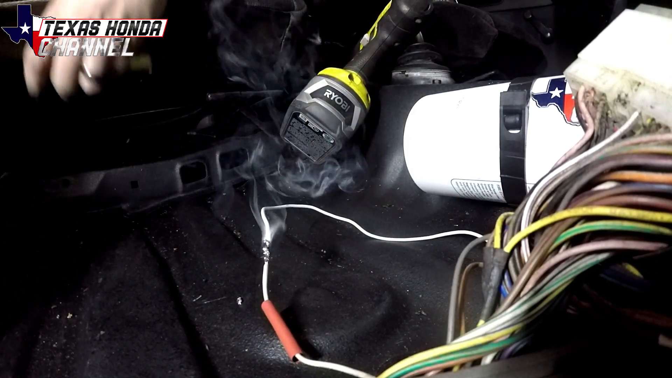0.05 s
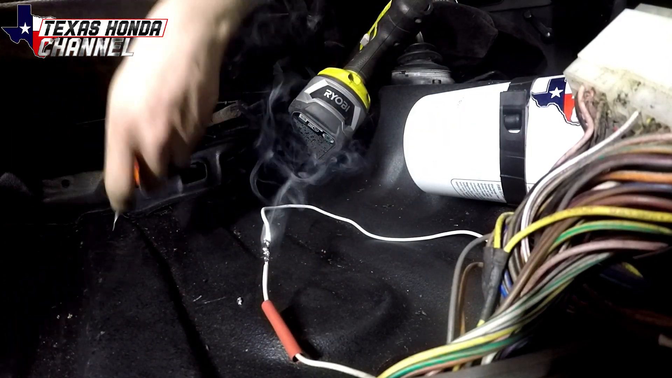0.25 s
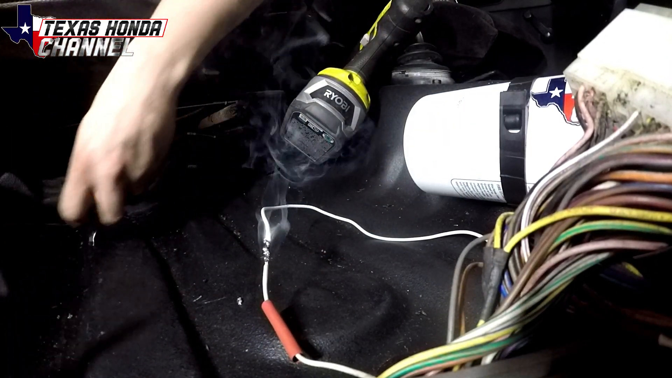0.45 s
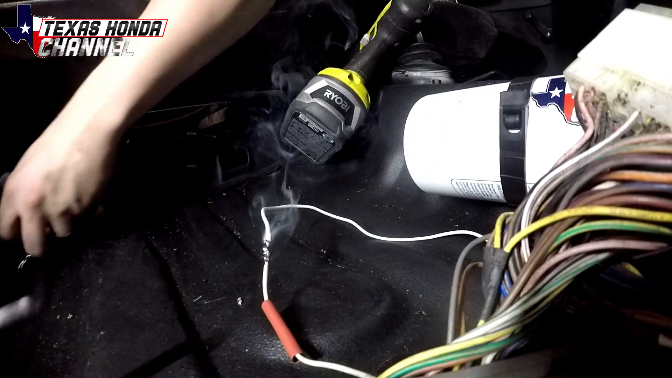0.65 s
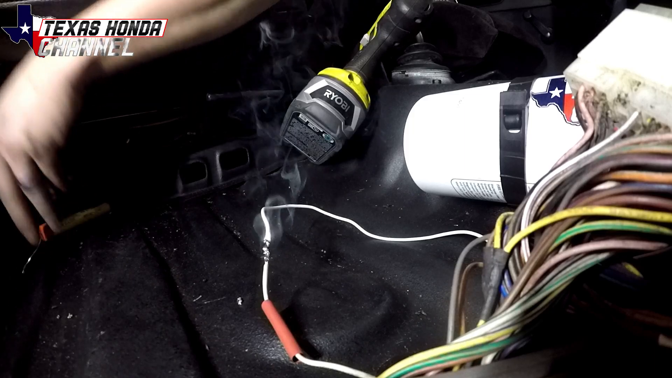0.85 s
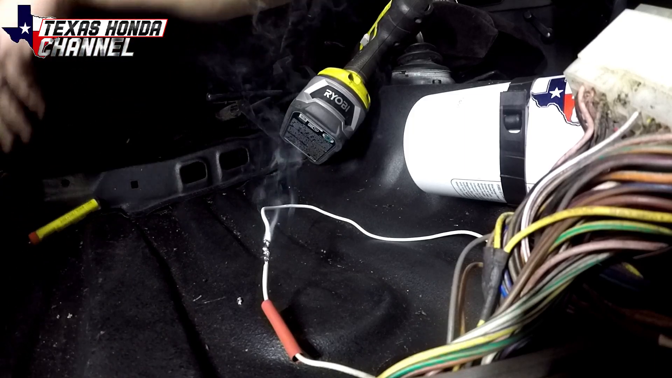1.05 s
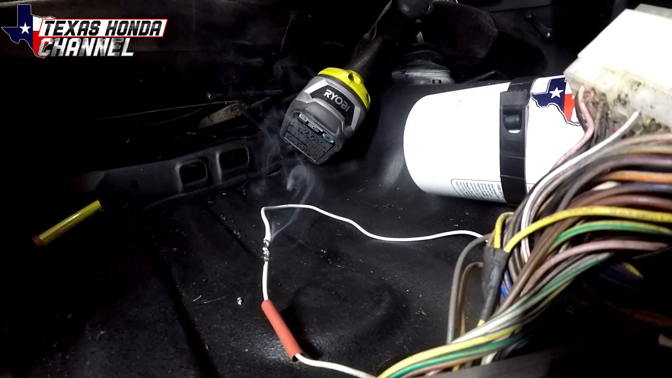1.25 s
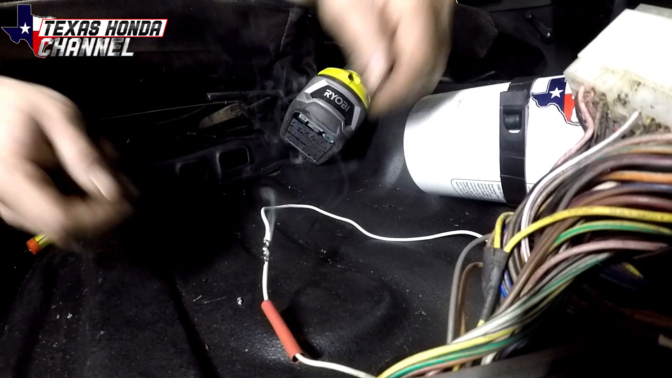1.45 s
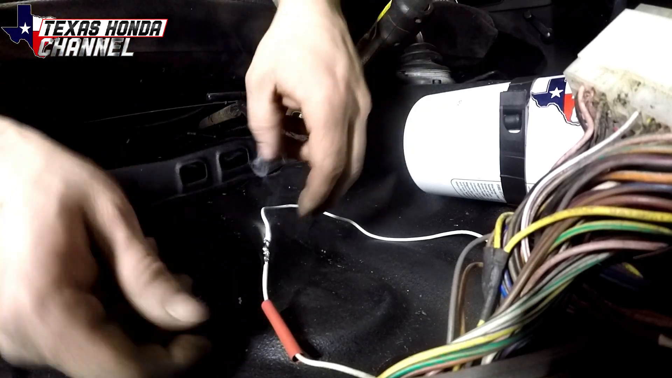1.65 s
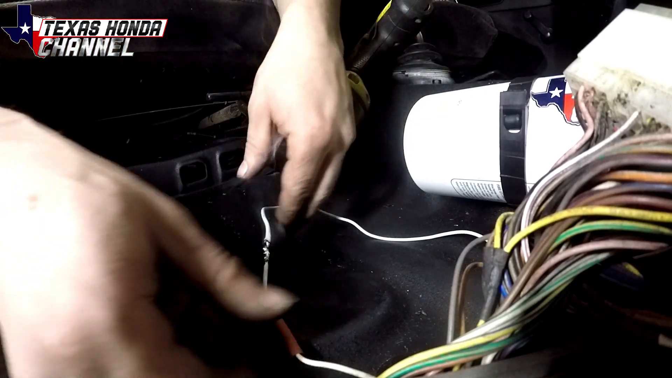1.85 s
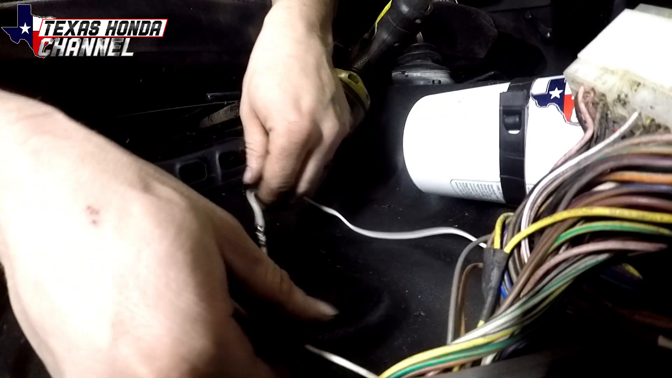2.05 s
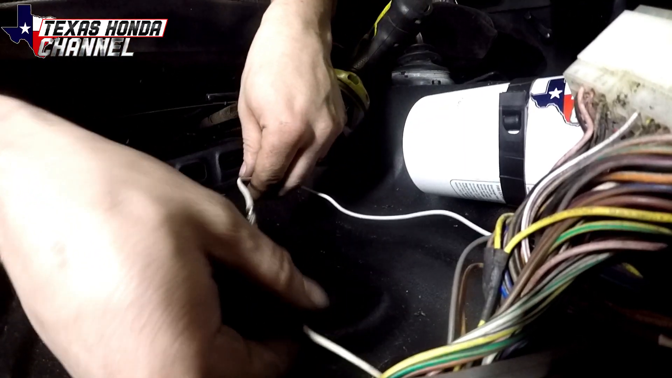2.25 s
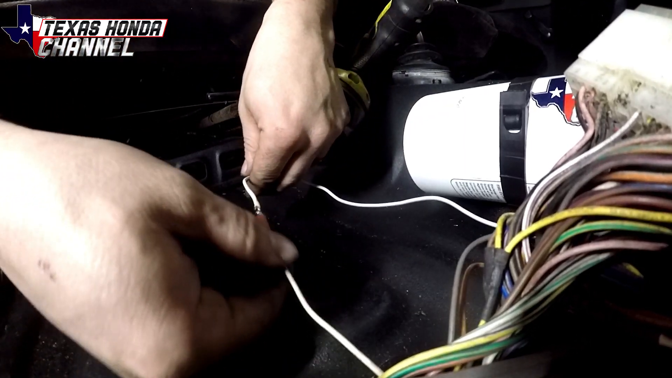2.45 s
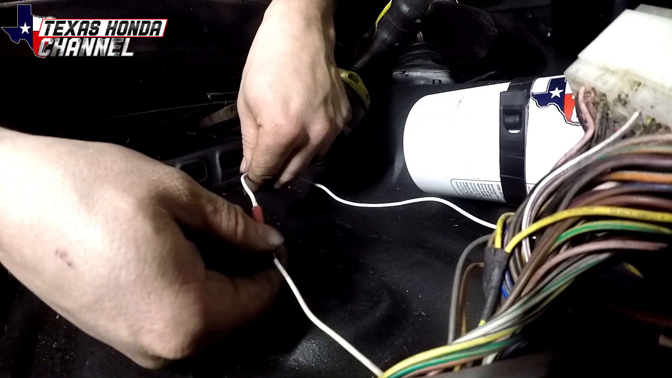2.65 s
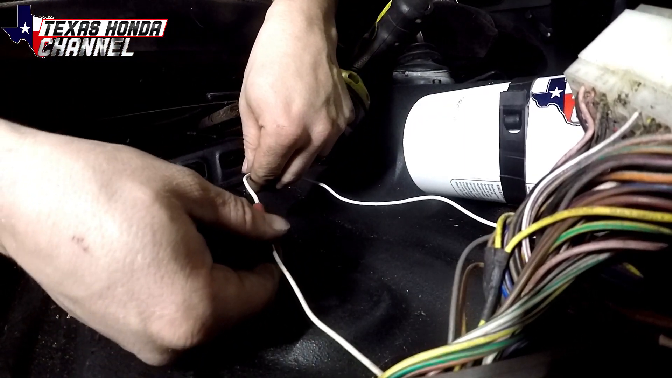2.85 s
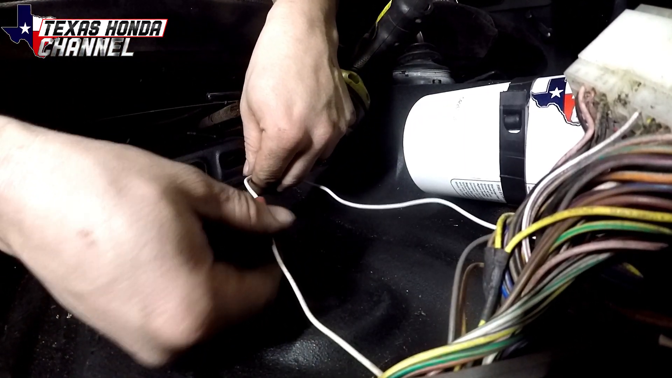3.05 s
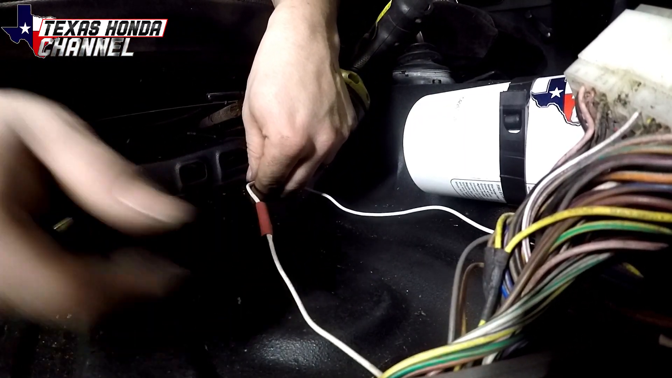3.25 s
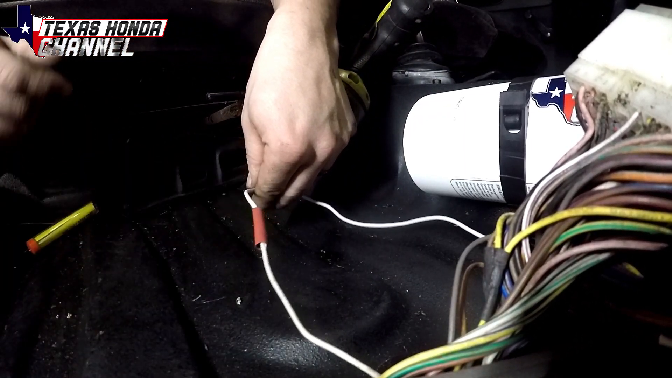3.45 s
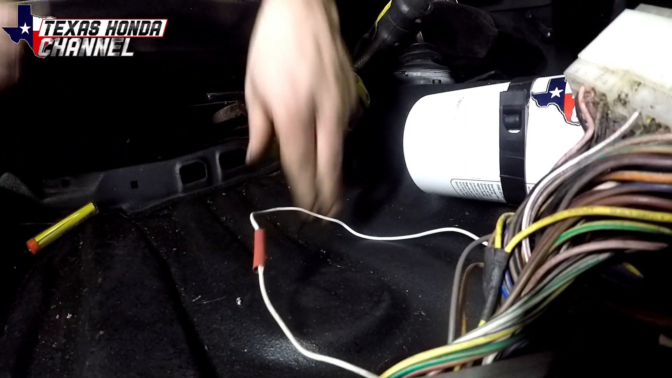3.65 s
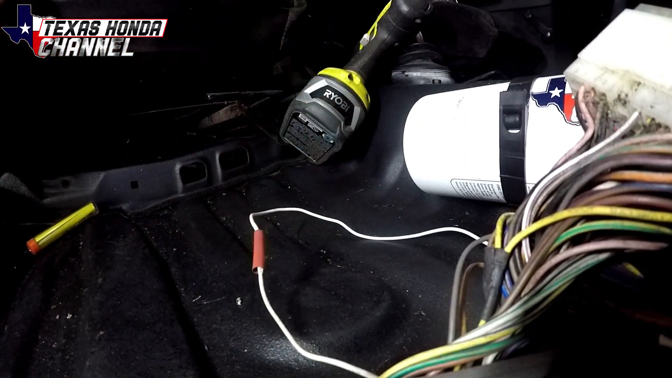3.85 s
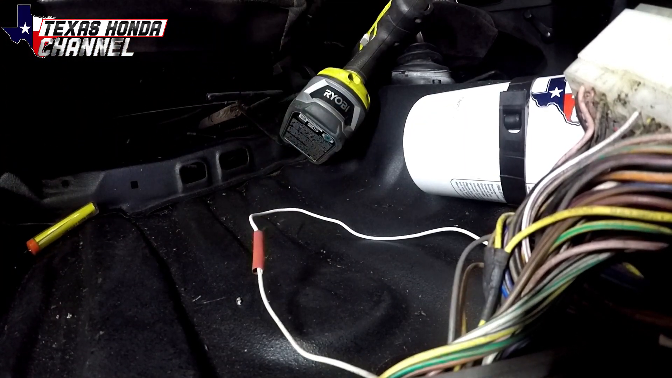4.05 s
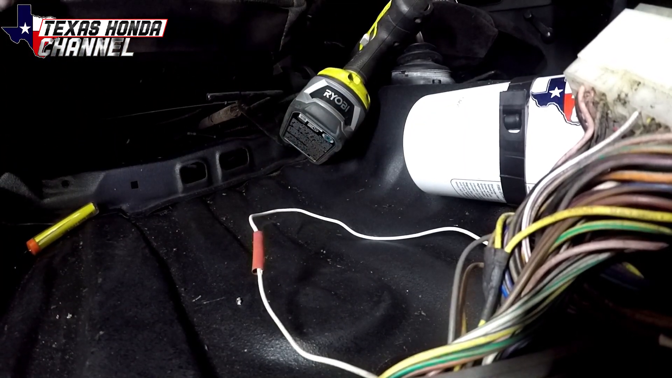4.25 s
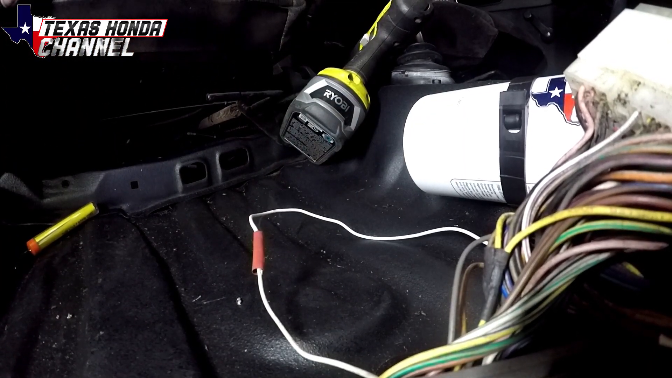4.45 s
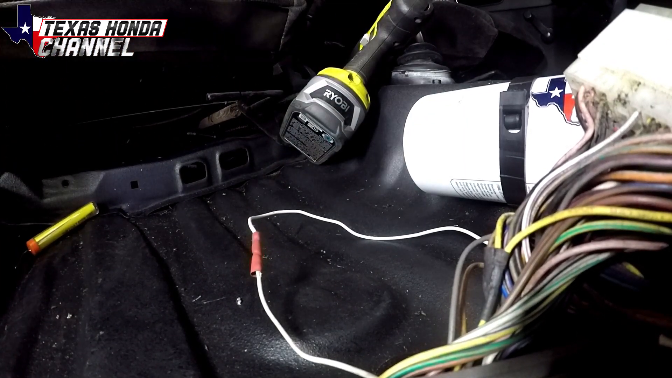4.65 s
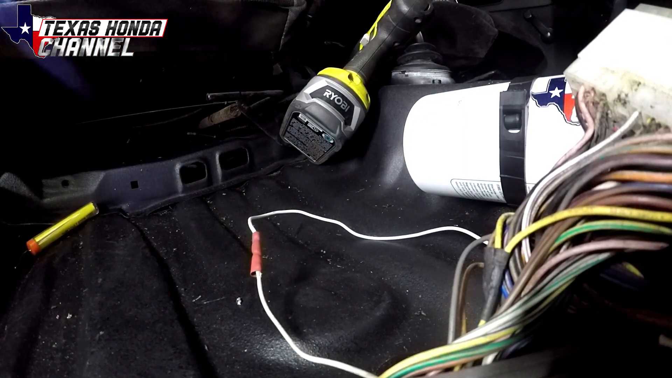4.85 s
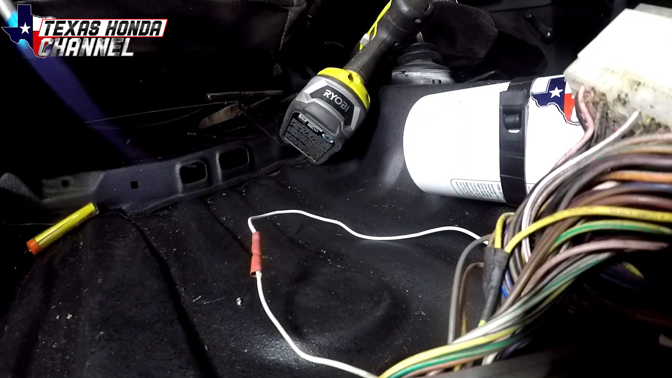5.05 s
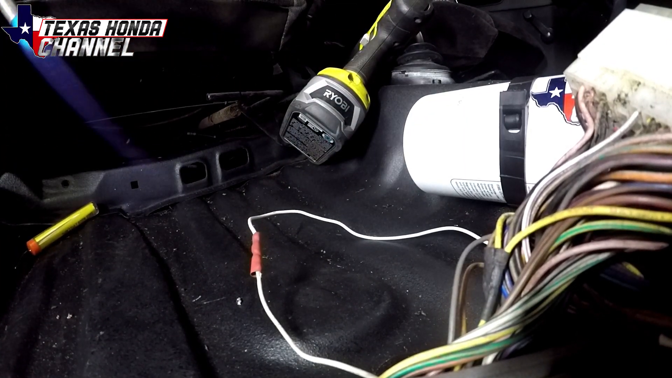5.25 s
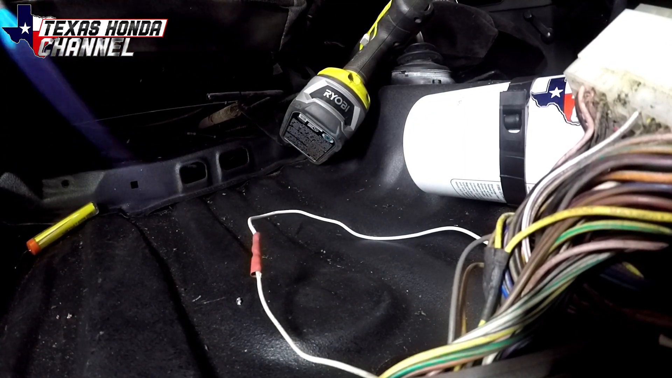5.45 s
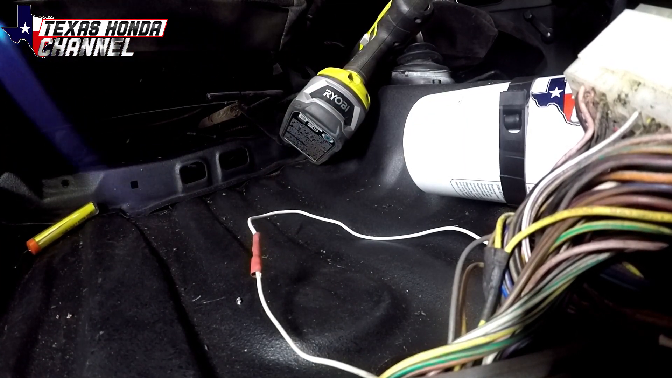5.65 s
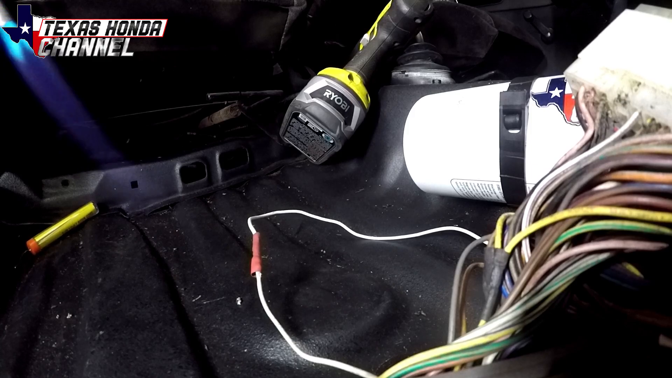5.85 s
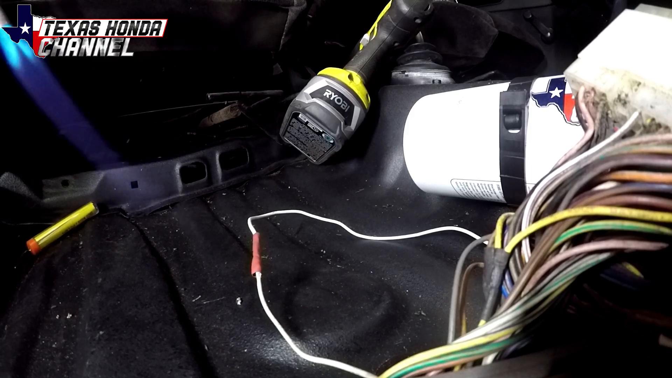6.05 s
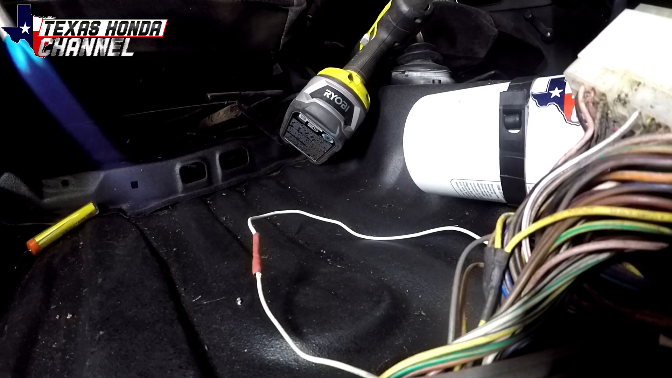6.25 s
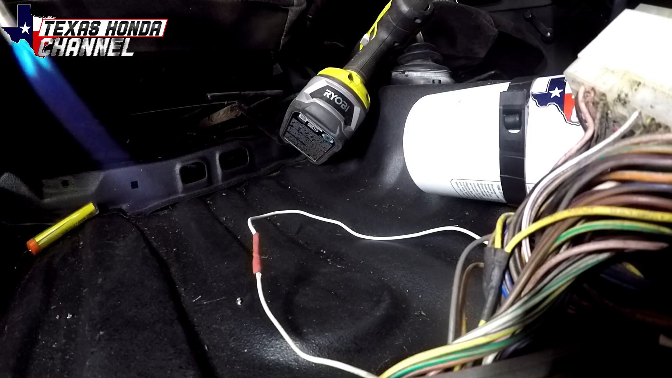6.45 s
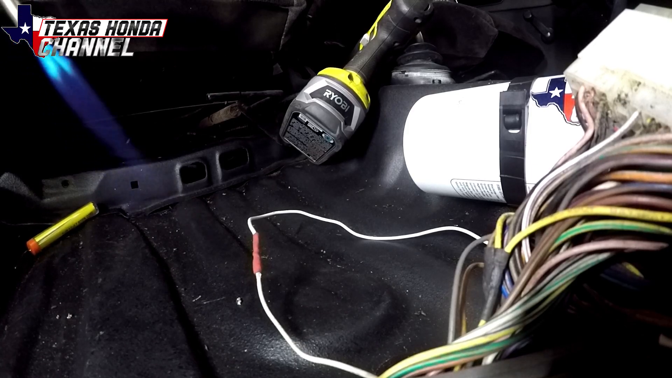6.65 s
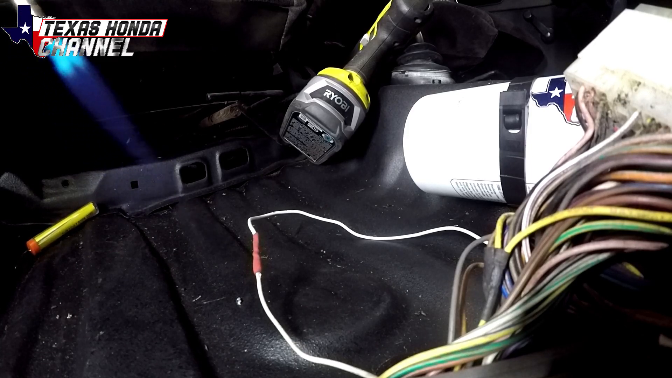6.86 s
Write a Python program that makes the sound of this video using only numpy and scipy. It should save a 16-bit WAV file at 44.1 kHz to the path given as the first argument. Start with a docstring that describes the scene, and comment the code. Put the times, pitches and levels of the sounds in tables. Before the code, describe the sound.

Hand tools clack and thud on a carpeted metal car floor, soft rustling follows, then a gas torch lights and roars with steady hiss.

```python
"""A low garage rumble with a faint motor hum and the rustle of hands come first: all shaped noise, plus hum tones.
The hands slide shrink tubing along a spliced wire on the carpeted floor of a stripped car.
Hand tools clack, the floor pan thuds (both decaying tones with bursts of noise) and leaning arms rumble.
Then a gas torch lights and burns on: noise for its roaring flame, its ringing burner tube and its hissing jet.
Echoes from the nearby panels colour the hiss as the torch is moved in."""
import sys
import numpy as np
from scipy import signal
from scipy.fft import rfft, irfft, next_fast_len
from scipy.io import wavfile
from scipy.ndimage import map_coordinates

SR = 44100
rng = np.random.default_rng(int(sys.argv[2]) if len(sys.argv) > 2 else 0)


def wav_record(signal):
    """Record a signal, one row per channel, as 16-bit PCM in the file named by sys.argv[1]."""
    frames = np.transpose(np.atleast_2d(signal))
    bounded = np.clip(frames, -1, 1)
    # unit amplitude maps onto the largest positive 16-bit level
    quanta = np.round(bounded * 32767).astype(np.int16)
    wavfile.write(sys.argv[1], SR, quanta)


N = 304731  # length of the scene (samples)


def amp(db):
    """Turn decibels into a gain."""
    return 10 ** (np.asarray(db) / 20)


def unit(x):
    """Scale x to an rms of 1."""
    return x / np.sqrt(np.mean(x ** 2) + 1e-20)


def along(points, hz):
    """Join (f/Hz, value) points with straight lines on a log frequency axis."""
    f, v = np.transpose(points)
    return np.interp(np.log(hz + 1), np.log(f + 1), v)


def wobble(rate):
    """Make a smooth random curve with this many random knots a second."""
    knots = rng.standard_normal(int(N * rate / SR) + 4)
    return map_coordinates(knots, [np.arange(N) * rate / SR])


def filtered(x, response):
    """Pass x through a filter of gain response(Hz) that reacts only after its input (minimum phase)."""
    m = 2 * next_fast_len(len(x) // 2 + 4096)
    gain = response(np.fft.rfftfreq(m, 1 / SR))
    cepstrum = irfft(np.log(np.maximum(gain, 1e-6)))
    # folding the second half onto the first leaves no sound before the input
    cepstrum[1:m // 2] *= 2
    cepstrum[m // 2 + 1:] = 0
    return irfft(rfft(x, m) * np.exp(rfft(cepstrum)))[:len(x)]


def noise(response, size=N):
    """Make noise of rms 1 whose spectrum follows response(Hz)."""
    m = next_fast_len(size)
    spectrum = rfft(rng.standard_normal(m)) * response(np.fft.rfftfreq(m, 1 / SR))
    return unit(irfft(spectrum, m)[:size])


def smooth(points):
    """Give the smooth response through (f/Hz, level/dB) points."""
    return lambda hz: amp(along(points, hz))


def resonant(peaks):
    """Give the response of steep-sided (f/Hz, half-width/Hz, level/dB) resonances."""
    return lambda hz: np.sqrt(sum((amp(db) / (1 + ((hz - centre) / width) ** 2)) ** 2
                                  for centre, width, db in peaks))


def ringing(modes, t, scatter_db, detune):
    """Add decaying tones whose strengths and pitches vary a little with the spot hit; the peak is 1."""
    chance = rng.standard_normal((len(modes), 2))
    ring = np.zeros(len(t))
    for k, ((hz, db, t60), (a, b)) in enumerate(zip(modes, chance)):
        decay = amp(db + scatter_db * a - 60 * t / t60)
        ring += (-1) ** k * decay * np.sin(2 * np.pi * hz * (1 + detune * b) * t)
    return ring / np.abs(ring).max()


def add(track, s, sound):
    """Mix a sound into the track at time s."""
    part = track[max(round(s * SR), 0):][:len(sound)]
    part += sound[:len(part)]


# how long the car's shell rings on: f/Hz, t60/s (time to fall by 60 dB)
SHELL_DECAY = [(100, 0.36), (1200, 0.28), (4000, 0.34), (12000, 0.34)]


def cabin(x, wet_db):
    """Add a short noise-like tail from the car's shell, drawn anew each time."""
    hz, t, z = signal.stft(rng.standard_normal(SR // 3), SR, nperseg=256)
    decay = amp(-60 * t / along(SHELL_DECAY, hz)[:, None])
    tail = signal.istft(z * decay, SR, nperseg=256)[1]
    return x + amp(wet_db) * signal.fftconvolve(x, tail / np.linalg.norm(tail))[:len(x)]


# tones of a distant motor in the garage: f/Hz, level/dB before the trim
MOTOR_HUM = [(129.2, -54), (258.4, -64.5), (452.2, -68.5), (1034, -82.5), (1852, -83.5), (2562, -79)]
# spectrum of the still garage: f/Hz, level/dB per Hz
ROOM_SPECTRUM = [(15, -5), (28, 1), (60, -1), (100, -1.5), (160, -3.5), (220, -18), (340, -19), (440, -22),
                 (700, -36), (1050, -35.5), (1500, -38), (2700, -36.5), (5000, -41), (9000, -47.5),
                 (15000, -54.5)]
ROOM_DB, HUM_TRIM_DB = -45, -0.5


def garage():
    """The room rumbles low under a thin hiss; the motor's tones drift slightly in level and phase."""
    t = np.arange(N) / SR
    hum = np.zeros(N)
    for hz, db in MOTOR_HUM:
        level = amp(db + HUM_TRIM_DB + 1.4 * wobble(5.9))
        hum += level * np.sqrt(2) * np.sin(2 * np.pi * hz * t + 0.36 * wobble(8.6))
    return hum + amp(ROOM_DB) * noise(smooth(ROOM_SPECTRUM))


def swell(s, length):
    """The rise and fall of one movement, highest in its middle, as one gain per sample."""
    u = np.clip((np.arange(N) / SR - s) / length, 0, 1)
    return np.abs(np.sin(np.pi * u)) ** 0.63  # a lower power gives a fuller swell


# sleeve and finger strokes: start t/s, length/s, rubbing level/dB, brushing level/dB
HAND_STROKES = [(0.0, 0.0527, -49, -57.5), (0.043, 0.33, -57.5, -59.5), (0.421, .26, -54, -56),
                (0.712, .12, -35.5, -58), (0.973, .22, -43.5, -59.5), (1.199, .08, -46, -61),
                (1.27, .14, -53.5, -68.5), (1.392, .14, -45.5, -59), (1.693, 0.093, -46.5, -53.5),
                (1.828, .3, -52.5, -59.5), (2.092, 0.055, -41.5, -53), (2.132, .07, -41.5, -55.5),
                (2.197, 0.18, -54, -61), (2.389, 0.09, -55.5, -65), (2.42, 0.446, -64, -67),
                (2.941, .12, -62.5, -73), (3.147, .04, -61.5, -67), (3.514, 0.082, -74, -62),
                (3.62, 0.071, -59, -71), (3.74, 0.1, -62.5, -62.5), (3.965, 0.18, -54, -56.5),
                (4.192, 0.057, -63, -63), (4.284, 0.13, -62.5, -63), (4.367, 0.19, -53, -65.5)]
# dull rubbing sound: f/Hz, level/dB per Hz
RUB_SPECTRUM = [(150, -29), (250, -2), (364, -4.5), (463, 3), (658, -5.5), (733, -5), (1090, -7.5),
                (1550, -17), (1860, -10), (2180, -21), (2640, -19), (4500, -31), (5850, -58.5),
                (9900, -120)]
# bright brushing sound: f/Hz, level/dB per Hz
BRUSH_SPECTRUM = [(1000, -32.5), (1700, -8.5), (2240, -7.5), (2440, -3), (2720, -5), (3040, -5.5),
                  (4970, -7.5), (8500, -21), (13400, -24.5), (15500, -31)]
# the floor answering the rubbed wire: f/Hz, half-width/Hz, level/dB
WIRE_RESONANCES = [(423, 30, 0.5), (1040, 44, -4.5), (1280, 34, -9.5), (1848, 74, -15.5), (2360, 25, -15.5)]
CATCHES_PER_S = 24  # average rate at which a nail or the wire snags
CATCH_DB, WIRE_DB = -9.5, -5  # snags against the rubbing; the wire's ring against the plain rub noise


def strokes():
    """Cloth and skin drag over carpet and wire with an uneven grip; now and then a nail or the wire catches."""
    rubbing, brushing = np.zeros(N), np.zeros(N)
    for s, length, rub_db, brush_db in HAND_STROKES:
        move = swell(s, length)
        rubbing += amp(rub_db) * move
        brushing += amp(brush_db) * move
    grip = unit(amp(0.72 * wobble(45) + 1.1 * wobble(160) + 3.6 * wobble(1200)))
    wire = amp(WIRE_DB) * noise(resonant(WIRE_RESONANCES))
    drag = unit(noise(smooth(RUB_SPECTRUM)) + wire)
    # each catch is a single click that sets the wire's resonances ringing
    slips = (rng.random(N) < CATCHES_PER_S / SR) * rng.uniform(.4, 1, N)
    snagged = filtered(slips, lambda hz: resonant(WIRE_RESONANCES)(hz) + .3 * smooth(RUB_SPECTRUM)(hz))
    catches = unit(cabin(snagged, wet_db=-4))
    rubbed = rubbing * (grip * drag + amp(CATCH_DB) * catches)
    brushed = brushing * grip * noise(smooth(BRUSH_SPECTRUM))
    return rubbed + brushed


# soft blows on the floor pan: t/s, level/dB, overtone level/dB, sway level/dB (the last two relative)
FLOOR_BLOWS = [(0.077, -25.5, -6, -14), (0.158, -14.5, -9, -24), (0.175, -13, -20, -17),
               (0.329, -28, 2, -14), (0.672, -14, -11.5, -36), (0.739, -17.5, -1, -31),
               (0.835, -11.5, -16, -38), (0.862, -12.5, -13, -34), (0.955, 0.5, -14, -38),
               (0.983, -4, -25, -36), (1.691, -12, -26, -22), (2.193, -25.5, -34, 3.5),
               (2.965, -41.5, -2, -11), (3.61, -28, -2.5, -26.5), (3.746, -24.5, -24.5, 1),
               (3.894, -34, -10, -11.5), (3.953, -31.5, -8, -8.5), (4.525, -16, -21.5, -5),
               (4.548, -24, -13.5, -2)]
# tones of the floor pan before the carpet damps them: f/Hz, level/dB, t60/s
PAN_MODES = [(134, 7, 0.21), (290, 2, 0.045), (439, -2.5, 0.085), (530, -17.5, 0.065), (697, -15.5, 0.12),
             (845, -31.5, 0.16), (1076, -15.5, 0.11)]
# dull burst of a blow on carpet: f/Hz, level/dB per Hz
PUFF_SPECTRUM = [(29, -51), (50, -13), (150, -11.5), (204, -8), (541, -17.5), (642, -23.5), (1060, -30),
                 (1650, -40.5), (3000, -56.5), (3900, -71.5), (6600, -120)]
SWAY_HZ = 63  # the whole floor rocking under a blow


def thuds():
    """The floor pan booms and sways under the carpet; each blow has its own share of overtones."""
    out, t = np.zeros(N), np.arange(SR // 3) / SR
    for s, db, overtone_db, sway_db in FLOOR_BLOWS:
        boom = ringing(PAN_MODES, t, scatter_db=2.5, detune=0.028)
        boom *= np.exp(-(t / .04) ** 2)  # the carpet smothers the ring
        puff = noise(smooth(PUFF_SPECTRUM), size=len(t)) * amp(-60 * t / 0.2)
        hit = (boom + 0.26 * puff) * (1 - np.exp(-t / 0.0014))  # soft onset

        def colour(hz):
            overtones = (overtone_db + 13) * along([(200, 0.0058), (520, 1.0)], hz)
            return amp(overtones + along([(40, -11.5), (110, 2.5)], hz))

        hit = filtered(hit, colour)
        sway = amp(sway_db + 13.5) * np.sin(2 * np.pi * SWAY_HZ * t) * amp(-60 * t / 0.11)
        blow = hit / np.std(hit[:SR // 40]) + sway
        add(out, s, cabin(amp(db - 11.0) * blow, wet_db=-15.0))
    return out


# hard tool contacts: t/s, level/dB, treble level/dB, body level/dB (both relative), ring length factor
TOOL_CONTACTS = [(0.123, -18, -7, -18, 0.63), (0.159, -13, -14.5, -11.5, 0.79),
                 (0.329, -23.5, -7.5, -24.5, 0.94), (0.475, -33.5, -12, -14, 1.0),
                 (0.66, -5, -20, -11.5, 1.0), (0.79, -27.5, -25.5, -7, 0.98),
                 (0.834, 3, -21.5, -17.5, 0.77), (1.027, -6, -24, -7.5, 0.9),
                 (1.071, -19, -15.5, -7.5, 0.69), (1.121, -22, -29, -8, 0.98), (1.234, -21, -44, 1, 1.0),
                 (1.336, -39.5, -2, -13, 0.7), (1.36, -42.5, -24, -14, 1.0), (1.421, -33.5, -33.5, 2, 0.6),
                 (1.456, -32.5, -31, 0, 0.8), (2.14, -24.5, -34, 6, 0.51), (2.233, -41.5, -22, -2, 0.8)]
# tones of a tool against the sheet metal, before each contact shortens them: f/Hz, level/dB, t60/s
TOOL_MODES = [(1111, -17.5, 0.14), (1309, -12.5, 0.13), (1612, -12.5, 0.096), (1910, -18, 0.14),
              (2125, -16, 0.11), (2390, -4, 0.041), (2583, -15, 0.12), (2654, -18.5, 0.13),
              (2920, -19.5, 0.1), (3240, -16.5, 0.065), (3360, -24, 0.13), (3670, -35, 0.16),
              (3670, -36, 0.19), (4140, -43, 0.18), (4560, -44, 0.14), (5130, -35, 0.11), (6180, -39, 0.1)]
# tool chatter: f/Hz, level/dB per Hz
CHATTER_SPECTRUM = [(240, -37), (400, -9), (595, -7.5), (1280, -4), (1400, -7), (1610, -6), (1760, -8.5),
                    (2430, -8), (2750, -10), (3010, -6.5), (3850, -13.5), (6280, -21.5), (6680, -27.5),
                    (15500, -57)]
# a tool rocks and touches again after a delay in this range: shortest t/s, longest t/s
REBOUND_RANGE = (.003, .008)


def clacks():
    """Tools chatter and ring; a harder contact is brighter and shorter, a heavier one has more body."""
    out, t = np.zeros(N), np.arange(SR // 3) / SR
    for s, db, treble_db, body_db, length in TOOL_CONTACTS:
        hardness = treble_db + 23.0
        life = length * np.exp(-.022 * hardness)
        uneven_fade = amp(-60 * t / (0.082 * life) + 0.78 * wobble(500)[:len(t)])
        chatter = noise(smooth(CHATTER_SPECTRUM), size=len(t)) * uneven_fade
        ring = ringing(TOOL_MODES, t, scatter_db=2, detune=.001) * amp(-60 * t / (.5 * life))
        onset = 1 - np.exp(-t / (.0008 * life))
        hit = (unit(ring) + .75 * unit(chatter)) * onset

        def colour(hz):
            treble = max(hardness, -12) * along([(2400, 0.058), (5500, 1.0), (12000, 1.3)], hz)
            body = (body_db + 16.5) * along([(1200, 1.0), (2300, 0.0039)], hz)
            return amp(treble + body)

        hit = filtered(hit, colour)
        add(hit, rng.uniform(*REBOUND_RANGE), .5 * hit)
        # the first touch is broadband
        tick = amp(-21.0) * rng.standard_normal(len(t)) * np.exp(-t / 0.00098)
        contact = hit / np.std(hit[:SR // 90]) + amp(hardness) * tick
        add(out, s, cabin(amp(db - 10.5) * contact, wet_db=-19.5))
    return out


# arms leaning on the floor: start t/s, length/s, rumble level/dB
ARM_LEANS = [(0.202, 0.22, -42), (0.52, 0.29, -40.5), (1.03, 0.49, -44.5), (1.737, .45, -37),
             (2.138, 0.18, -35), (2.36, .17, -40), (3.78, .1, -43), (3.98, 0.083, -33), (4.08, .08, -40),
             (4.279, 0.14, -36), (4.42, .16, -34)]
# floor rumble under an arm: f/Hz, level/dB per Hz
LEAN_SPECTRUM = [(12, -37.5), (20, -3), (60, 7), (87, -3.5), (129, 0.5), (174, -9), (264, -16.5),
                 (380, -23.5), (450, -21), (580, -44), (990, -120)]


def leans():
    """The floor rumbles unevenly whenever an arm puts weight on it."""
    weight = sum(amp(db) * swell(s, length) for s, length, db in ARM_LEANS)
    return weight * amp(1.44 * wobble(14)) * noise(smooth(LEAN_SPECTRUM))


def wandering(x, depth_db):
    """Let broad patches of the spectrum of x slowly swell and fade."""
    z = signal.stft(x, nperseg=512)[2]
    knots = rng.standard_normal((140, 20))
    bins, frames = np.indices(z.shape)
    field = map_coordinates(knots, [bins / 2.2, frames / 70], mode="nearest")
    return signal.istft(z * amp(depth_db * field), nperseg=512)[1][:N]


# combustion roar: f/Hz, level/dB per Hz
FLAME_SPECTRUM = [(12, -50), (20, -10.5), (53, -8), (87, 1.5), (145, 1), (274, 5.5), (414, 1.5), (451, 2.5),
                  (600, -3.5), (780, -78), (1320, -120)]
# air resonances of the footwell: f/Hz, half-width/Hz, level/dB
FOOTWELL_RESONANCES = [(63.38, 3.6, 2), (149.7, 4.6, 2), (210.9, 15.6, -4.5), (271, 8.5, -5.5),
                       (452.6, 6.8, -8.5)]
# resonances of the burner tube: f/Hz, half-width/Hz, level/dB
TUBE_RESONANCES = [(883.4, 139, 3.5), (1102.3, 27, -0.5), (1690, 270, -7.5)]
# gas hiss: f/Hz, level/dB per Hz
JET_SPECTRUM = [(1120, -1.5), (1900, -7), (2070, -13), (2250, 4), (2680, 3.5), (2920, -17), (4120, -5.5),
                (4450, -5.5), (5040, -0.5), (6270, -8.5), (7480, -12), (8530, -17.5), (13700, -20.5),
                (15500, -38)]
# peaks in the hiss while the nozzle points away: f/Hz, half-width/Hz, level/dB
TURNED_PEAKS = [(1687, 89, 4.5), (2540, 25, -19), (2880, 31, 1), (3193, 69, 2), (3560, 80, 2.5),
                (4260, 200, -9), (4760, 75, -6), (5320, 52, -3), (8250, 73, -22)]
# peaks in the hiss once it points at the splice: f/Hz, half-width/Hz, level/dB
AIMED_PEAKS = [(2255, 107, 2), (2834, 55, 4.5), (3030, 67, 3), (3330, 144, 0), (3783, 110, 1),
               (4096, 93, 0.5), (4374, 30, 0), (4986, 120, -0.5), (5710, 58, 0), (6010, 52, -7.5),
               (6750, 240, -11.5), (7383, 75, -7), (7860, 69, -16)]
# echoes from near panels with the torch in place: delay/s, gain
PANEL_ECHOES = [(.00121, 0.075), (.0015, -0.065), (.00266, 0.058), (.00295, -0.076), (.00355, .13),
                (.00517, -0.028)]
# farther echoes with the torch in place: delay/s, gain
FAR_ECHOES = [(.0066, 0.11), (.0079, -0.15), (.0097, 0.13), (0.0128, -.14), (0.0158, 0.13)]
TORCH_ON_S = 4.570
SETTLE_S, TURN_S = .36, 0.94  # time constants: bringing the torch in, turning the nozzle to the splice
FLAME_DB, NOZZLE_DB, JET_DB = -29.5, -35, -37  # the three voices once the torch is in place
FLAME_AWAY_DB, NOZZLE_AWAY_DB, JET_AWAY_DB = -2, -8, -1  # their change while it is still held away
PATH_SHORTER = .21  # share by which the echo paths are shorter at first


def torch():
    """A turbulent flame, a resonant tube and a gas jet swell, and panel echoes slide, as the torch comes in."""
    n = np.arange(N)
    burning_s = np.maximum(n / SR - TORCH_ON_S, 0)
    away = np.exp(-burning_s / SETTLE_S)
    aim = 1 - np.exp(-burning_s / TURN_S)
    flutter = wobble(60)  # shared by flame and tube

    roar = amp(-1.5) * noise(smooth(FLAME_SPECTRUM)) + amp(-6.5) * noise(resonant(FOOTWELL_RESONANCES))
    flame = amp(FLAME_DB + FLAME_AWAY_DB * away + 1.1 * flutter + 0.16 * wobble(9)) * roar

    nozzle_level = amp(NOZZLE_DB + NOZZLE_AWAY_DB * away + .5 * flutter + 0.58 * wobble(7))
    nozzle = nozzle_level * noise(resonant(TUBE_RESONANCES))

    # one set of peaks gives way to the other while the nozzle swings round
    turned = np.sqrt(1 - aim) * noise(resonant(TURNED_PEAKS))
    aimed = np.sqrt(aim) * noise(resonant(AIMED_PEAKS))
    peaks = wandering(turned + aimed, depth_db=1.5)
    gas = wandering(amp(-5.5) * noise(smooth(JET_SPECTRUM)), depth_db=2.2)
    jet = amp(JET_DB + JET_AWAY_DB * away + 0.35 * wobble(23)) * (gas + amp(-3.0) * peaks)

    hiss = nozzle + jet
    # echoes comb the hiss; the combs sink in pitch as the paths lengthen and tremble with the hand
    path = 1 - PATH_SHORTER * away
    for echoes in (PANEL_ECHOES, FAR_ECHOES):
        reflected = np.zeros(N)
        for delay, gain in echoes:
            heard_from = n - delay * SR * (path + .003 * wobble(2))
            reflected += gain * np.interp(heard_from, n, hiss)
        hiss = hiss + reflected
    lit = np.clip(burning_s / 0.0022, 0, 1)
    return (flame + hiss) * lit


def scene():
    """Add all the layers into one channel."""
    return (garage() + strokes() + thuds() + clacks() + leans() + torch())[None]


TOP_HZ = 15500  # nothing at or above this frequency is kept


def record(dry):
    """Round off the tallest peaks, then cut everything from the band limit up."""
    held = dry / (1 + np.abs(dry) ** 6) ** (1 / 6)
    m = next_fast_len(N + SR // 2)
    kept = np.fft.rfftfreq(m, 1 / SR) < TOP_HZ
    return irfft(rfft(held, m) * kept, m)[:, :N]


dry = scene()
out = record(dry)
wav_record(out)
```